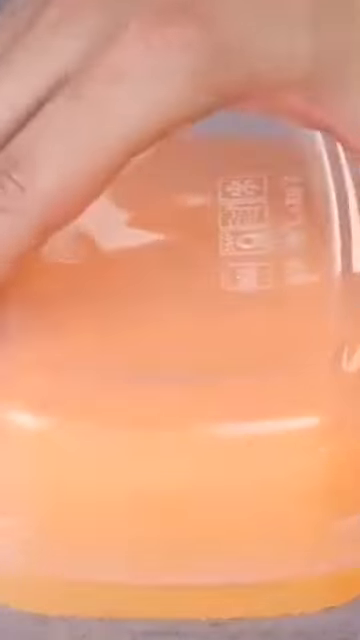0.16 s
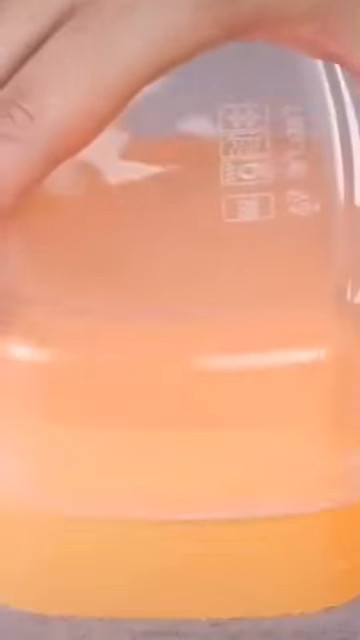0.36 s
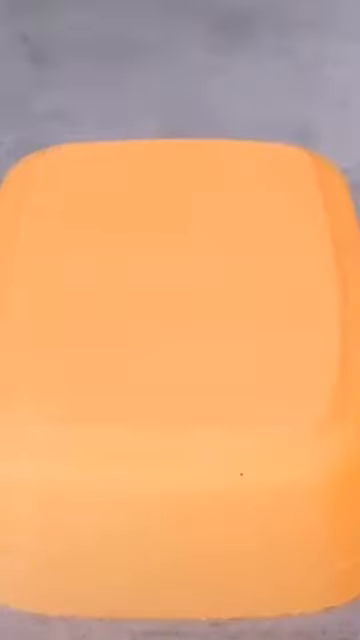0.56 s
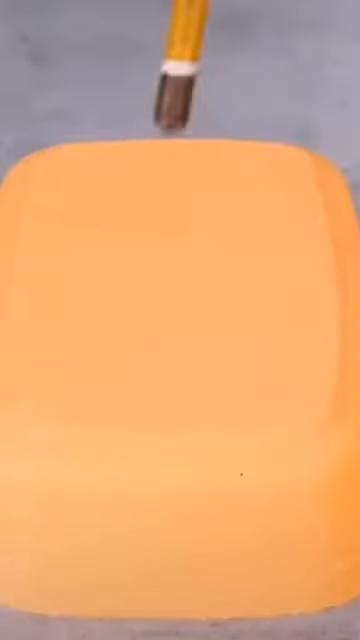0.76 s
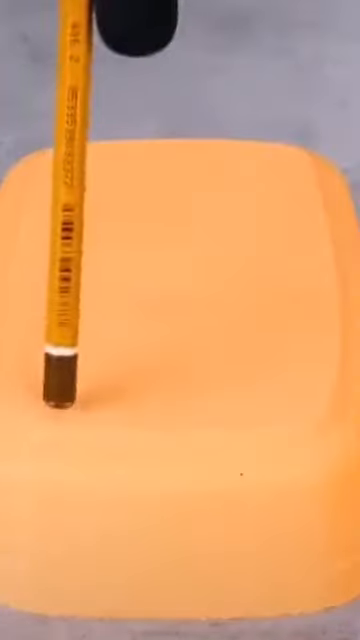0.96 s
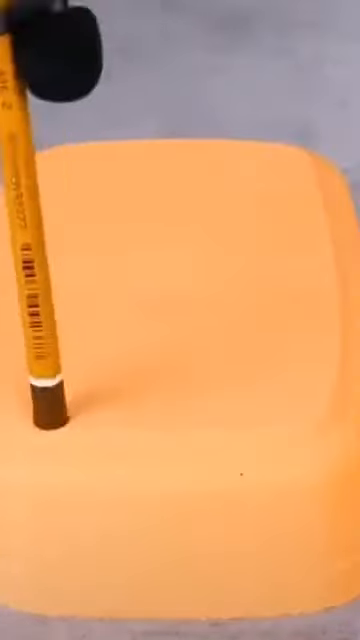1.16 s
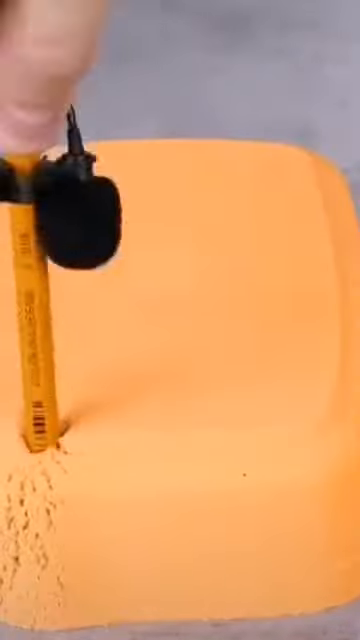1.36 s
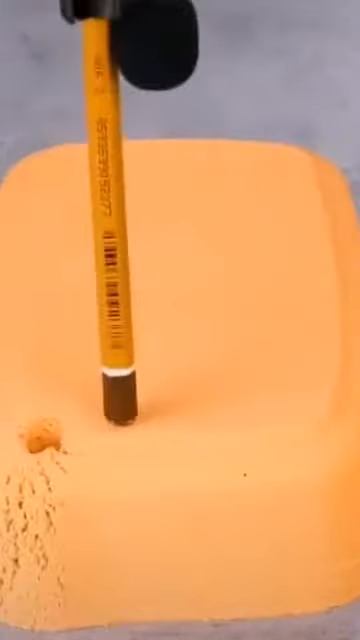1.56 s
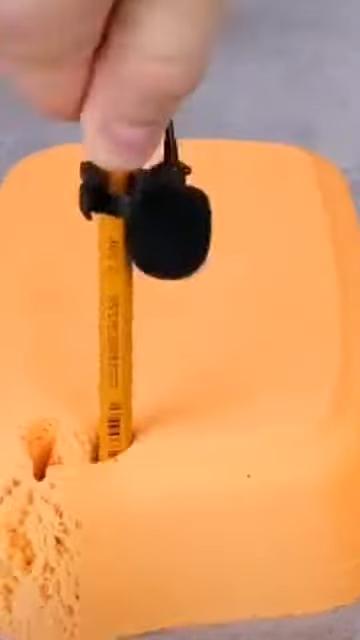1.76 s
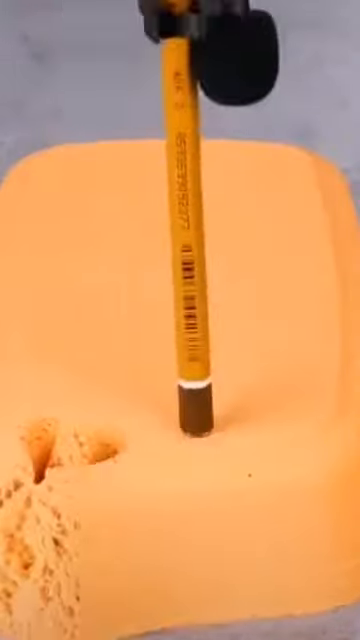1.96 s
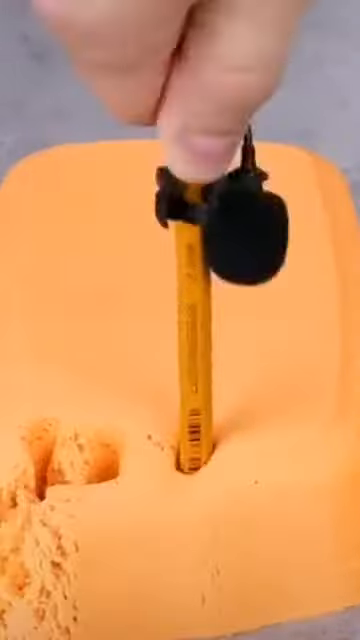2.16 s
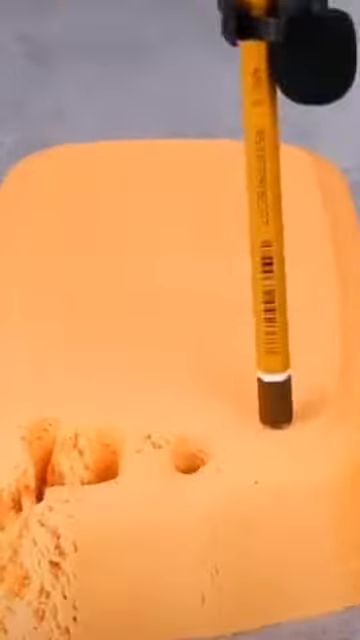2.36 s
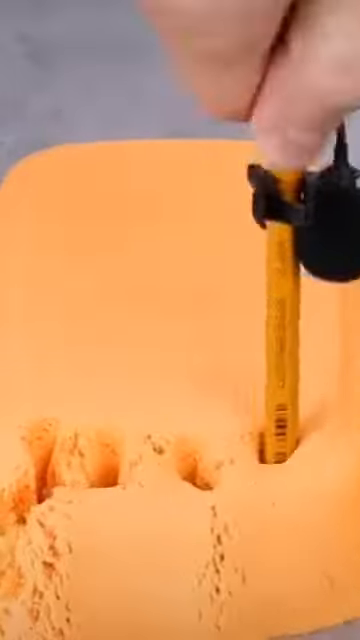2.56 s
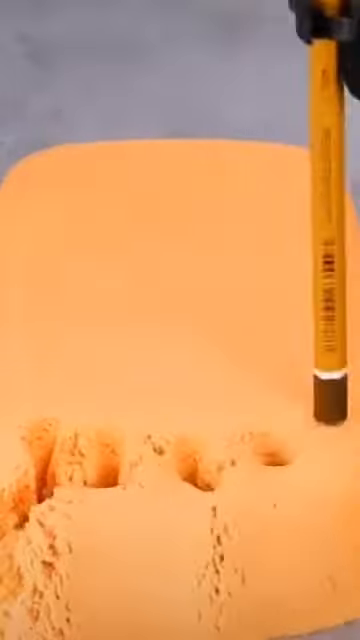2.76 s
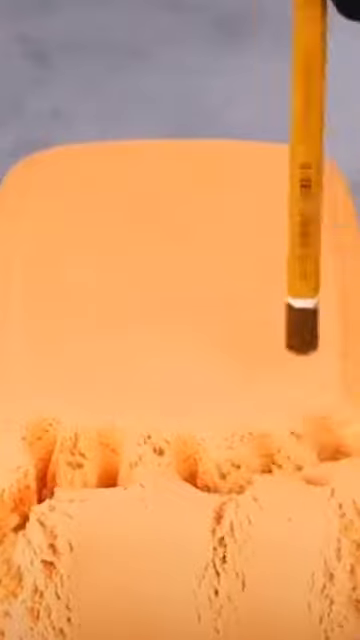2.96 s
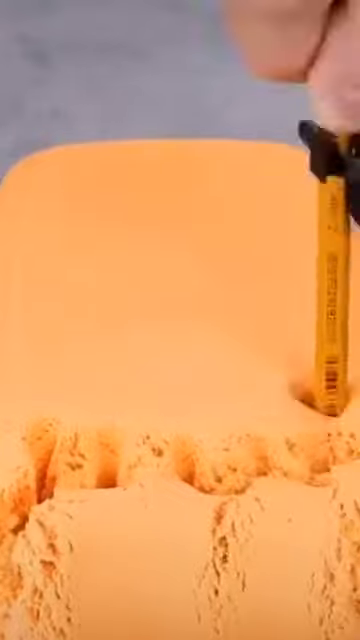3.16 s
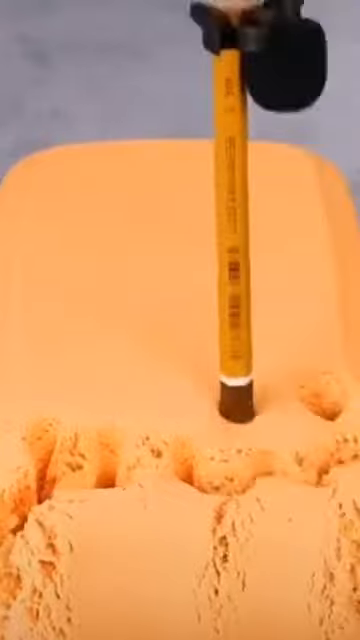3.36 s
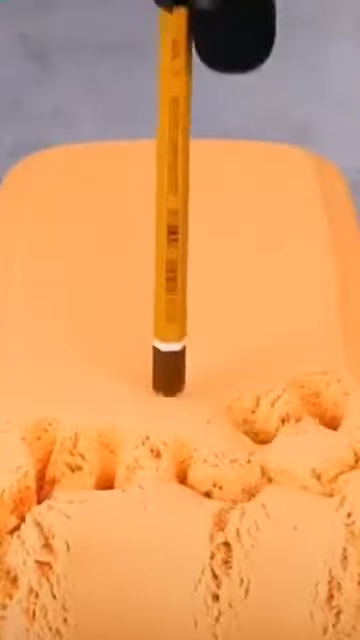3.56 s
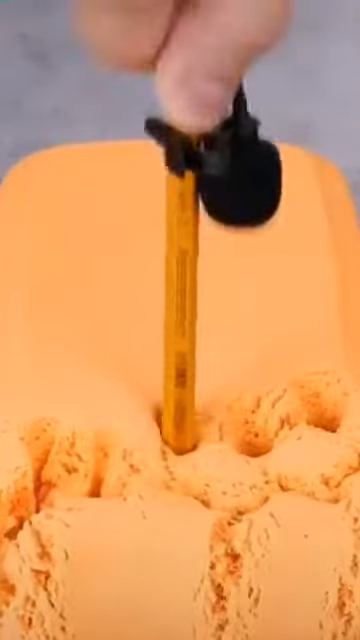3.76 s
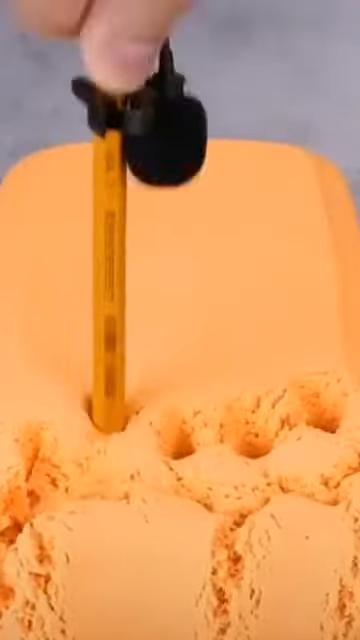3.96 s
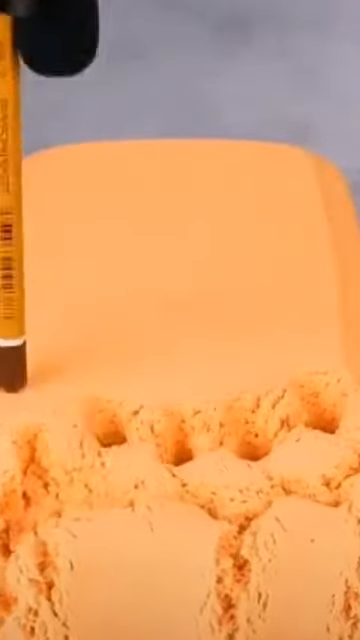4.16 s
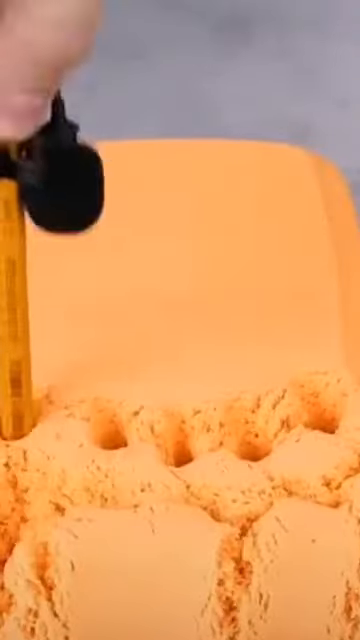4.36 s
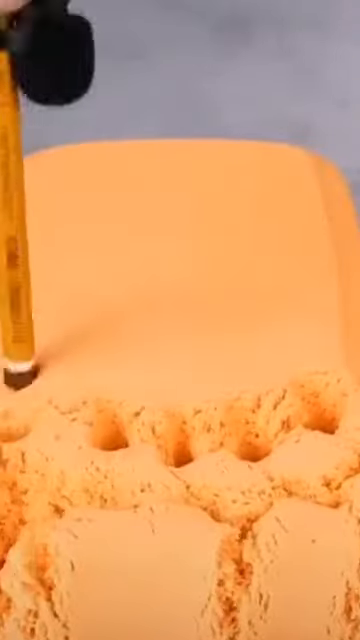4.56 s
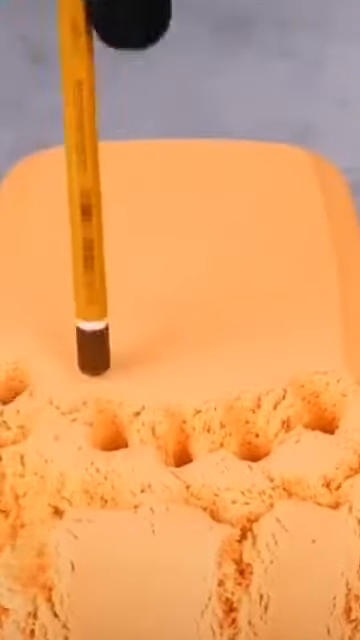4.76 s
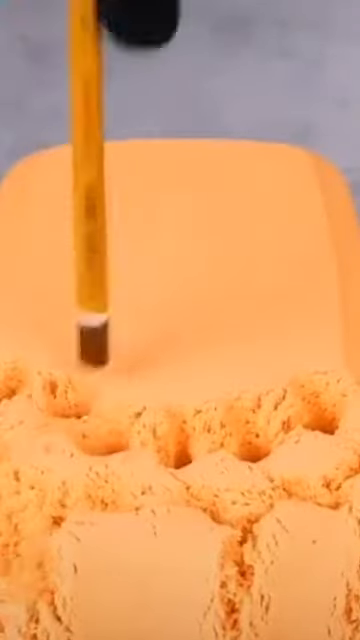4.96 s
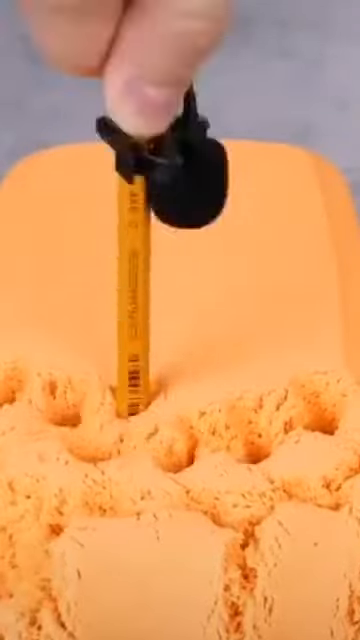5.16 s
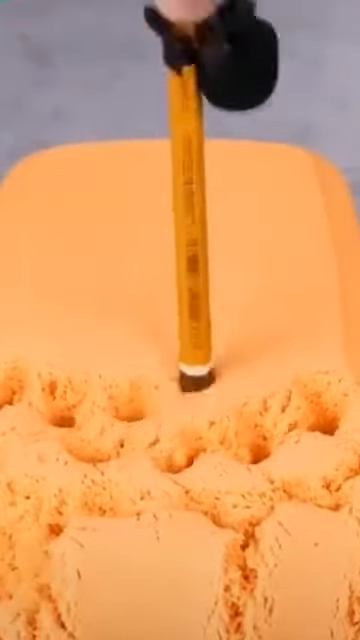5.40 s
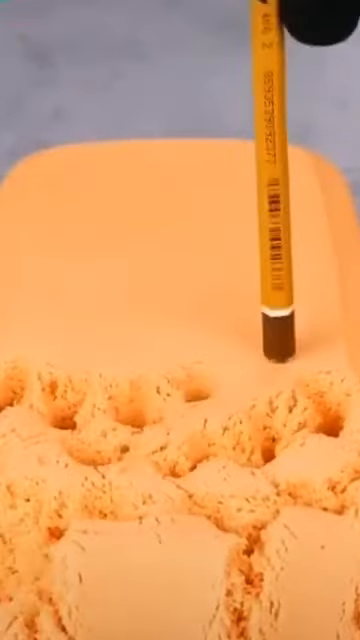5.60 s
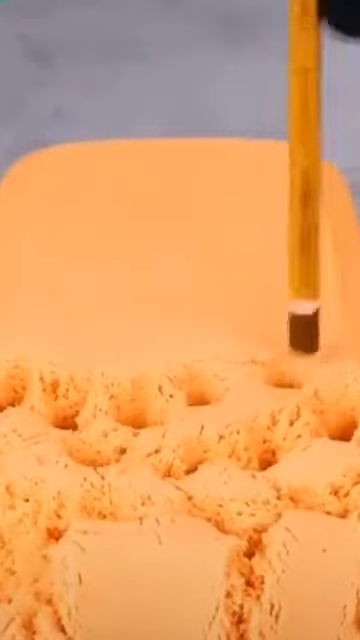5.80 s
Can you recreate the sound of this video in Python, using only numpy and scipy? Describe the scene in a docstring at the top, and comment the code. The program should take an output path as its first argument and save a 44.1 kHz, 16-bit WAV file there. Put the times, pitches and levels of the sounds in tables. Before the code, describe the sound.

A half-second scrape of thin hard plastic with a couple of hollow knocks, then quiet. Next come fourteen pencil pushes into a firm sand block: a short dry woody tap, then crisp grains giving way in a swelling crunch that dies before the next tap. Breaking clods snap and low handling thumps sit faintly below. Microphone on the pencil, dry room, almost no background.

```python
"""A rasp and hollow knocks open the scene: a plastic tub is pulled off a block of damp crunchy sand.
Then the blunt end of a pencil, with a small microphone clipped to it, is pushed into the sand fourteen times.
Each push is a swelling crunch of slipping grains, made of random clicks in narrow flickering bands; each
landing is a dry tap, made of pulse pairs and short wood ringing. Breaking clods, snapping grains and dull
knocks stand out of the crunch; hand and table rumble faintly below as filtered noise."""
import sys
import numpy as np
from scipy import signal
from scipy.io import wavfile
from scipy.ndimage import uniform_filter1d

SR = 44100
rng = np.random.default_rng(int(sys.argv[2]) if len(sys.argv) > 2 else 0)


def master(y):
    """Save y as 16-bit WAV."""
    cut = np.clip(np.atleast_2d(y).T, -1, 1)
    pcm = np.round(cut * 32767)  # scale
    wavfile.write(sys.argv[1], SR, pcm.astype(np.int16))


def rack_gain(trim_db):
    """Turn a fader trim in dB into the linear factor to multiply a signal by."""
    fader = np.asarray(trim_db, float)
    return 10 ** (fader / 20)


N = 257103
TIME = np.arange(N) / SR   # s

# landings of the pencil: start_s, stop_db, gap_ms (start of the stop to the rebound), width_ms (each pulse),
# wood_db (firmness: drive of the wood relative to the stop)
TAPS = [(1.044, -17.5, 0.65, 0.48, -27), (2.0037, -14, 0.64, 0.41, -24), (2.4118, -9, 0.81, 0.39, -27.5),
        (2.775, -14.5, 0.72, 0.5, -24.5), (3.0643, -4, 0.78, 0.53, -34.5), (3.3779, 6, 0.57, 0.32, -35),
        (3.6446, -3.5, 0.76, 0.54, -34), (3.9236, 0, 0.68, 0.39, -41), (4.2028, -7.5, 0.84, 0.51, -35),
        (4.5492, -8, 0.87, 0.48, -31), (4.829, -2, 0.78, 0.41, -36.5), (5.0992, -1, 0.8, 0.54, -37),
        (5.3581, -4, 0.79, 0.62, -37), (5.6154, -5.5, 0.85, 0.61, -40.5)]


def rms_one(x):
    """Scale to rms 1."""
    return x / np.sqrt(np.mean(x ** 2) + 1e-20)


def in_time(rows):
    """Read the columns of a table as curves over time, practically silent outside it."""
    times_s, *columns = np.transpose(rows)
    return [np.interp(TIME, times_s, column, left=-140, right=-140) for column in columns]


def stretches(tables, lead_s):
    """Join tables: each sets in at once, lead_s before its first row; until then the last one holds."""
    rows = list(tables[0])
    for table in tables[1:]:
        start_s = table[0][0] - lead_s
        hold = (start_s - .001, *rows[-1][1:])
        onset = (start_s, *table[0][1:])
        rows += [hold, onset, *table]
    return in_time(sorted(rows, key=lambda row: row[0]))


def at_hz(points, hz):
    """Read a spectrum on a log frequency axis."""
    points_hz, values = np.transpose(points)
    return np.interp(np.log(hz), np.log(points_hz), values)


def drift(rate_hz):
    """Slow random wandering with spread 1, drawn at every 20th sample and interpolated."""
    r = np.exp(-40 * np.pi * rate_hz / SR)
    noise = rng.standard_normal(N // 20 + 1002)
    slow = signal.lfilter([1], [1, -2 * r, r * r], noise)[1000:]   # skip the filter's start
    return np.interp(np.arange(N) / 20, np.arange(len(slow)), rms_one(slow))


def ring(force, hz, t60_s):
    """A resonance: a unit click sets a sine of height 1 ringing, falling 60 dB in t60_s."""
    r = rack_gain(-60 / (t60_s * SR))
    w = 2 * np.pi * hz / SR
    return signal.lfilter([0, np.sin(w)], [1, -2 * r * np.cos(w), r * r], force + 1e-18)


def band(x, low_hz, high_hz, order=2):
    """Butterworth band-pass."""
    return signal.sosfilt(signal.butter(order, [low_hz, high_hz], "band", fs=SR, output="sos"), x)


def bump(start_s, width_s):
    """One smooth push of height 1."""
    return np.sin(np.pi * np.clip((TIME - start_s) / width_s, 0, 1)) ** 2


def grains(spectrum, parts, per_s, spread_db, clump_db, patchy_db):
    """Grains slip in clumps and ring narrow flickering bands; parts = (low Hz, high Hz, level dB curve)."""
    # left-right likeness over frequency: pitch_hz, likeness (1 = the same in both channels)
    likeness = [(300, 0.89), (3900, 1), (4600, 0.67), (6500, 0.24), (9000, 0.16), (13000, 0.31)]
    clumps = rack_gain(clump_db * drift(90))
    slips = rng.random((3, 2, N)) < per_s / SR      # neighbouring bands are rung by other grains
    strengths = rack_gain(spread_db * rng.exponential(1, slips.shape))
    slips = slips * strengths * rng.choice([-1, 1], slips.shape) * clumps
    out = np.zeros((2, N))
    k = 0
    for low_hz, high_hz, level_db in parts:
        part = 0
        edges = np.geomspace(low_hz, high_hz, 2 + int(6 * np.log2(high_hz / low_hz)))
        for low, high in zip(edges, edges[1:]):
            k += 1
            mid, side = band(slips[k % 3] + 1e-18, low, high)
            hz = np.sqrt(low * high)
            alike = np.clip(at_hz(likeness, hz), 0, 1)
            flicker_db = patchy_db * (1 + 600 / hz) * drift(23)   # coarse lumps come more unevenly
            gain = rack_gain(at_hz(spectrum, hz) + flicker_db)
            part = part + gain * (np.sqrt(1 + alike) * mid + np.sqrt(1 - alike) * side * [[1], [-1]])
        out += rack_gain(level_db) * part / np.sqrt(np.mean(part.mean(axis=0) ** 2))
    return out


def crunch():
    """Sand gives way under the pencil as slipping grains; a breaking clod is a short surge in every band."""
    # the pushes in stretches, the first push in two and every other in one:
    # time_s, fine_db (fine grit), coarseness_db (how much the larger lumps give way)
    pushes = [
        [(1.052, -55.5, -1), (1.16, -51.5, -38), (1.188, -49, -24), (1.206, -44.5, -39), (1.274, -39, -3),
         (1.29, -37.5, -11.5), (1.424, -25, -7), (1.464, -30, -19), (1.478, -40, 8), (1.52, -41, -10.5),
         (1.62, -83, -6)],
        [(1.638, -68, 8), (1.664, -47.5, -24.5), (1.796, -22, -5), (1.84, -21, -13), (1.876, -43.5, -8.5),
         (1.892, -36, -5.5), (1.93, -71, -4), (1.978, -75, -13), (1.99, -76, -22)],
        [(2.012, -51.5, -4), (2.058, -50.5, -10.5), (2.076, -40, -29.5), (2.102, -34.5, -7.5),
         (2.16, -29.5, -4), (2.208, -18.5, -11), (2.25, -41, -11.5), (2.296, -40.5, -1), (2.32, -69, 8.5),
         (2.386, -80, -24), (2.4, -103, 16)],
        [(2.42, -51, 2.5), (2.446, -50, -10.5), (2.52, -33, -16), (2.586, -24, -3.5), (2.618, -23.5, -16),
         (2.64, -42, -15), (2.66, -44.5, 1), (2.674, -62, -5), (2.688, -49, 16), (2.704, -73, 12),
         (2.765, -79, -14)],
        [(2.785, -44, -9), (2.825, -43.5, -18.5), (2.853, -33.5, -8.5), (2.893, -30.5, 1), (2.913, -21.5, -2.5),
         (2.945, -36, -13.5), (2.959, -49.5, 0), (2.991, -41, -11.5), (3.021, -71, 1), (3.045, -75, -9),
         (3.055, -97, 15)],
        [(3.073, -45.5, 0), (3.093, -45, -6), (3.111, -46, -18), (3.159, -24.5, -6), (3.185, -23.5, -0.5),
         (3.221, -20.5, -15), (3.269, -46.5, -1), (3.285, -44, -15), (3.305, -69.5, 2), (3.351, -73, -18),
         (3.37, -82, 5)],
        [(3.386, -44, -1.5), (3.406, -39.5, -10), (3.456, -26.5, -7), (3.478, -26, -6), (3.49, -21, -8),
         (3.498, -17, -10), (3.522, -26, -14.5), (3.54, -42, 2), (3.556, -46, -4.5), (3.622, -75, -2),
         (3.635, -88, 8)],
        [(3.653, -48, 0), (3.657, -50, -5), (3.701, -30, -10.5), (3.745, -25, -1.5), (3.777, -22.5, -4),
         (3.787, -22.5, -9), (3.807, -36, -12.5), (3.823, -39, 4), (3.853, -41.5, -11), (3.897, -78, 3),
         (3.915, -85, 19)],
        [(3.932, -51, -4), (3.952, -42, -9), (4.02, -26.5, 0.5), (4.062, -21, -9), (4.086, -33.5, -17),
         (4.096, -44.5, 5.5), (4.144, -31.5, -10.5), (4.19, -84, 6), (4.195, -79, 25)],
        [(4.211, -37.5, -11), (4.221, -53.5, 7), (4.273, -43, -13), (4.319, -31, -15), (4.335, -36, 1.5),
         (4.393, -19.5, -8.5), (4.435, -43.5, -6), (4.461, -42.5, -9), (4.499, -76, -0.5), (4.525, -73, -8),
         (4.54, -88, 2)],
        [(4.558, -57, 11), (4.572, -46, -17), (4.598, -41, -6.5), (4.616, -30.5, -13), (4.648, -30, 0.5),
         (4.684, -21.5, -11), (4.696, -25, 1), (4.712, -26, -6.5), (4.814, -78.5, 0), (4.82, -75, 17)],
        [(4.837, -49.5, -12), (4.859, -41.5, -12.5), (4.891, -25.5, -4.5), (4.925, -27, -4.5),
         (4.953, -19, -9.5), (5.051, -77.5, 5), (5.075, -68.5, -26.5), (5.09, -75, 17)],
        [(5.107, -43, 1.5), (5.111, -44, -25), (5.131, -38.5, -6), (5.151, -28, 1), (5.169, -20, -9.5),
         (5.185, -28, 1.5), (5.211, -18.5, -6.5), (5.247, -41.5, -7.5), (5.279, -34.5, -13), (5.319, -75.5, 3),
         (5.35, -72, -8)],
        [(5.366, -48, 1), (5.392, -42, -8), (5.42, -28, -6.5), (5.48, -23, -7), (5.496, -19.5, -15),
         (5.506, -27, -19), (5.514, -40.5, -2.5), (5.542, -34, -10), (5.58, -70.5, -6), (5.605, -76, 8)],
        [(5.624, -44, -4), (5.656, -44.5, -9), (5.686, -27, -4.5), (5.704, -29.5, 0), (5.742, -15.5, -13.5),
         (5.752, -23.5, -10.5), (5.772, -39, -5.5), (5.79, -42, -5), (5.804, -35.5, -11), (5.816, -35, -14),
         (5.83, -60, -7)],
    ]
    # clods breaking off: time_s, strength_db, fall_ms (time constant)
    clods = [(1.267, -38, 5.5), (1.48, -12, 1.1), (1.549, -28, 5), (1.627, -45, 3), (2.305, -33, 2),
             (2.685, -12, 1.35), (2.907, -17, 8.4), (3.187, -22, 2.7), (3.497, -3, 3), (3.537, -21.5, 6.7),
             (3.573, -25, 2.6), (3.769, -19, 3.5), (3.818, -20, 4.1), (4.051, -9, 9), (4.387, -14, 1.7),
             (4.951, -8, 1.8), (5.205, -10, 4.5), (5.419, -15, 7.3), (5.682, -33, 4.9)]
    # grain sizes from lumps to fine grit: offset_db (re grit), follows (share of the coarseness swing),
    # share_db (share of a clod's surge)
    sizes = [(-8.5, 1.07, -13), (-0.25, 0.89, -9.5), (0.5, 0.51, -5), (1.08, 0.009, -1.5)]
    # colour of the slipping grains: pitch_hz, density_db (relative, per Hz)
    spectrum = [(450, 1), (560, -20), (850, -5.5), (1400, -7.5), (2300, -2.5), (3200, -5.5), (4500, -7.5),
                (6200, -5.5), (7800, -4.5), (9600, 1.5), (11000, -1.5), (13000, -9)]
    rise_ms = 0.3
    fine_db, coarseness_db = stretches(pushes, .008)
    surge = 0
    for s, db, fall_ms in clods:
        age_ms = 1000 * (TIME - s - .002)
        surge = surge + rack_gain(db - 13) * np.exp(-np.maximum(-age_ms / rise_ms, age_ms / fall_ms))
    levels_db = []
    for offset_db, follows, share_db in sizes:
        sliding = rack_gain(fine_db + offset_db + follows * coarseness_db)
        levels_db.append(20 * np.log10(sliding + rack_gain(share_db) * surge))
    parts = zip([520, 1100, 2300, 5000], [1100, 2300, 5000, 13600], levels_db)
    return grains(spectrum, parts, per_s=6700, spread_db=0.5, clump_db=1.5, patchy_db=2.0)


def landings():
    """The tip stops (pull), rebounds (push); the wood rings briefly, the table thuds and sends an echo."""
    # ringing modes of the pencil: pitch_hz, level_db, t60_s
    modes = [(237, 11.5, 0.014), (514, -3.5, 0.029), (835, -14, 0.036), (1810, 18.5, 0.0018),
             (2910, -9, 0.033), (3780, -1, 0.012), (9170, 11, 0.0069)]
    table_hz, table_t60_s, table_echo_ms = 88, 0.024, 2.26
    echo_over_wood_db = 17.5   # firm sand passes more on to the table too
    blow, rebound, thud, crack = np.zeros((4, N))
    struck = np.zeros((len(modes), N))
    vary_db = rng.normal(0, 0.77, (len(TAPS), len(modes)))   # mode strengths vary a little from tap to tap
    for (s, db, gap_ms, width_ms, wood_db), tap_vary_db in zip(TAPS, vary_db):
        width_s = max(width_ms, .1) / 1000
        echo_db = db + wood_db + echo_over_wood_db
        for lag_ms, gain in [(0, rack_gain(db)), (table_echo_ms, rack_gain(echo_db))]:
            start_s = s + lag_ms / 1000
            blow -= gain * bump(start_s, width_s)
            rebound += gain * bump(start_s + gap_ms / 1000 - 0.47 * width_s, width_s)
        struck[:, round(s * SR)] = -rack_gain(db + wood_db + tap_vary_db)
        thud -= rack_gain(db - 51) * bump(s, 0.00027) / (0.0021 * SR)
        crack += rack_gain(db - 24.5) * np.exp(-np.maximum(TIME - s, 0) / 0.0025) * (TIME >= s)
    slack = np.exp(-1 / (0.0002 * SR))      # the rebound dies away more slowly than it rises
    blow += 1.07 * signal.lfilter([1 - slack], [1, -slack], rebound)
    # the microphone passes little of the blow below 110 Hz
    blow = signal.sosfilt(signal.butter(2, 110, "high", fs=SR, output="sos"), blow)
    wood = sum(rack_gain(db) * ring(clicks, hz, t60_s) for clicks, (hz, db, t60_s) in zip(struck, modes))
    grit = band(rng.standard_normal(N), 1300, 12000) * crack
    return blow + wood + ring(thud, table_hz, table_t60_s) + grit


def snaps():
    """Short clicks that ring for about two cycles, with an overtone and no bass."""
    # single short clicks, snapping grains and a second contact of the tip at 2.41 s:
    # time_s, strength_db, pitch_hz
    short_clicks = [(1.269, -29.5, 1430), (1.48, -16, 1580), (1.551, -32, 2900), (1.629, -39, 1230),
                    (2.4124, -29, 1970), (2.687, -27.5, 1640), (2.912, -28, 2540)]
    out = np.zeros(N)
    for s, db, hz in short_clicks:
        age_s = np.maximum(TIME - s - .001, 0)
        tone = np.sin(2 * np.pi * hz * age_s) + .7 * np.sin(3.7 * np.pi * hz * age_s)
        out -= rack_gain(db + 2) * tone * np.exp(-age_s * hz / 1.2)
    return band(out, 900, 9000)


def dull_knocks():
    """Some lumps drop with a short, soft, dull knock: a low sine that swells and dies in milliseconds."""
    # dropping lumps: time_s, strength_db, pitch_hz
    drops = [(1.378, -35, 400), (1.48, -36, 710), (1.629, -38.5, 436), (1.761, -38, 614), (2.304, -25, 412),
             (2.589, -35, 663), (2.685, -37, 223), (2.909, -23.5, 540), (3.189, -27, 481),
             (3.537, -32.5, 425), (3.767, -28.5, 660), (4.052, -45, 678), (5.417, -33, 710),
             (5.5, -34, 433), (5.731, -34, 202)]
    out = np.zeros(N)
    for s, db, hz in drops:
        age_s = np.maximum(TIME - s + 0.0007, 0)
        swell = np.exp(-age_s / 0.0036) * (1 - np.exp(-age_s / 0.0033))
        out += rack_gain(db + 6) * np.sin(2 * np.pi * hz * age_s) * swell
    return out


def tub():
    """The wall scrapes along the sand and knocks as it flexes, each knock with its own mode strengths."""
    # one table a tug: time_s, rasp_db, hollowness_db, brightness_db
    tugs = [
        [(0.0, -55, 1, -2), (0.016, -71, 9, 9), (0.024, -57, -1, 1.5), (0.042, -57.5, 8.5, 5.5),
         (0.05, -42.5, 7.5, -9.5), (0.074, -61, 3, 1), (0.094, -50, 6, 1.5), (0.13, -62, 0, -4)],
        [(0.13, -67, 0, -7), (0.162, -48.5, 3, -1.5), (0.172, -45.5, 1.5, -18), (0.182, -55, 8, -8),
         (0.226, -58.5, 7, 0.5), (0.278, -59, -27, -11), (0.29, -49, -39, -12.5), (0.44, -68, -38.5, -13)],
        [(0.44, -75, -38, -7), (0.446, -70, -43, -13), (0.52, -47.5, -9, 4), (0.546, -50, -6, -1),
         (0.566, -73, -11, 1), (0.59, -80, -30, 6), (0.616, -114, 5, 15), (0.64, -114, 4, 21)],
    ]
    # colour of the scrape: pitch_hz, density_db (relative, per Hz)
    spectrum = [(500, -14), (1400, -8), (2000, -14), (2400, -2), (2800, 0), (3300, -7), (5500, -10),
                (7200, -18), (9600, -12), (13000, -16)]
    # knocks of the flexing tub: time_s, strength_db
    flexes = [(0.049, -16), (0.093, -26), (0.1, -31), (0.151, -34), (0.158, -30), (0.17, -12)]
    # ringing modes of the tub: pitch_hz, level_db (relative), t60_s
    modes = [(460, -8, 0.054), (830, -5, 0.041), (1190, -2, 0.0067), (1606, 6.5, 0.0089),
             (2010, 3.5, 0.012), (2800, -12, 0.012), (4140, -13.5, 0.01)]
    scrape_db, hollow_db, bright_db = in_time([row for table in tugs for row in table])
    boom_db = -13.5 + 2 * hollow_db   # the lowest part swings more than the hollow part
    upper_db = -1 + bright_db
    fine_db = -5.5 + 1.54 * bright_db   # the fine part follows brightness more steeply
    parts = [(450, 1100, scrape_db + boom_db), (1100, 2000, scrape_db + hollow_db), (2000, 3500, scrape_db),
             (3500, 6200, scrape_db + upper_db), (6200, 13600, scrape_db + fine_db)]
    out = grains(spectrum, parts, per_s=9000, spread_db=2.0, clump_db=2.5, patchy_db=3.0)
    at = [round(s * SR) for s, db in flexes]
    flex_db = np.array(flexes)[:, 1]
    vary_db = rng.normal(0, 0.86, (len(flexes), len(modes)))
    for k, (hz, db, t60_s) in enumerate(modes):
        clicks = np.zeros(N)
        clicks[at] = rack_gain(flex_db + db - 14.5 + vary_db[:, k]) * (-1) ** k
        out += ring(clicks, hz, t60_s)
    return out


def stirring():
    """Levels of the three low layers: uneven background, a dying stir after each landing, and the jolts."""
    # uneven low background rumble: time_s, level_db
    background = [(0, -55), (.1, -78), (.29, -104), (.4, -90), (.464, -71), (.526, -106), (.63, -106),
                  (.81, -70), (1.0, -83), (1.1, -69.5), (1.3, -70.5), (1.65, -62), (1.75, -100),
                  (1.9, -63.5), (2.4, -71), (2.53, -104), (2.65, -74.5), (5.83, -65.5)]
    # jolts of the hand: time_s, table_db (table mode), deep_db (deep part), block_db (block part)
    jolts = [(.022, -53, -66, -52), (.05, -63, -47, -49.5), (.1, -57.5, -60.5, -75), (.826, -72, -76, -68),
             (1.38, -41.5, -50, -51), (1.405, -54, -62, -63), (1.65, -64, -71, -77), (1.887, -53, -70, -71),
             (2.08, -53.5, -66, -76), (2.13, -47, -59, -80), (2.2, -44, -55.5, -83),
             (2.266, -50.5, -69, -66), (2.308, -55, -70, -49), (2.61, -53, -87, -80), (2.69, -52, -77, -67),
             (2.83, -67, -73, -63), (2.93, -49, -61, -82), (3.12, -67, -61, -43), (3.216, -59, -57, -92),
             (3.488, -41, -61, -83), (3.538, -57.5, -53.5, -52), (3.78, -41, -66, -59),
             (3.84, -59, -61, -76.5), (4.063, -46.5, -51, -69.5), (4.419, -47, -58, -84),
             (4.663, -51, -51.5, -75), (4.734, -58, -64, -77), (4.88, -61, -55, -57),
             (4.951, -43, -63, -58), (5.15, -43, -67, -51), (5.213, -49.5, -61, -67), (5.41, -55, -61, -53),
             (5.515, -51, -60, -50), (5.742, -32, -55, -37)]
    # what a landing leaves in table mode, deep part, block part: level_db, follows (share of the landing's dB),
    # fall_db_per_s, background_share_db (the layer's level re the background curve)
    after_tap = [(-33.5, 0.68, 491, -5.3), (-63, 1.5, 153.5, -2), (-38, 0.2, 396.5, -12)]
    rise_db_per_s, jolt_fall_db_per_s = 1297.5, 302
    background_db, = in_time(background)
    gains = []
    for k, (db, follows, fall_db_per_s, background_share_db) in enumerate(after_tap):
        gain = rack_gain(background_db + background_share_db)
        for s, tap_db, *shape in TAPS:
            stir_db = db + follows * tap_db - fall_db_per_s * np.maximum(TIME - s, 0)
            gain = gain + rack_gain(stir_db) * (TIME >= s)
        for s, *jolt_db in jolts:
            below_peak_db = np.maximum(rise_db_per_s * (s - TIME), jolt_fall_db_per_s * (TIME - s))
            gain = gain + rack_gain(jolt_db[k] - below_peak_db)
        gains.append(gain)
    return gains


def rumble():
    """Noise bands for the table mode, a deeper rumble and dull knocks in the block, over a faint room floor."""
    # colour of the room floor: pitch_hz, density_db (relative, per Hz)
    floor_spectrum = [(330, -4), (450, -12), (660, -6), (900, -18), (1300, -26), (13000, -30)]
    floor_db = -94   # rms
    floor = sum(rack_gain(db) * band(rng.standard_normal(N), hz, 1.3 * hz) for hz, db in floor_spectrum[:-1])
    out = rack_gain(floor_db) * np.array([rms_one(floor)] * 2)
    # table mode, deep part, block part: low_hz, high_hz, flicker_db, side_db
    layers = [(86.0, 108, 2.2, -29.5), (28, 69, 1.4, -11.5), (190, 278.6, 6.2, -18.5)]
    for gain, (low_hz, high_hz, flicker_db, side_db) in zip(stirring(), layers):
        noise = band(rng.standard_normal((2, N)), low_hz, high_hz)
        mid, side = noise * rack_gain(flicker_db * drift(12))
        out += gain * (mid + rack_gain(side_db) * side * [[1], [-1]]) / np.std(mid)
    return out


def scene():
    """All sources, heard from the pencil's microphone."""
    return crunch() + dull_knocks() + snaps() + landings() + tub() + rumble()


def suppressor(x):
    """In short frames, turns down bass far below the strongest band and treble weaker than its neighbours."""
    below_strongest_db, below_neighbours_db, muted_db = -28, -8.5, -40.5
    hz, _, z = signal.stft(x, SR, nperseg=1024)
    power = uniform_filter1d(np.mean(np.abs(z) ** 2, axis=0), size=3, axis=0) + 1e-20
    treble_limit = uniform_filter1d(power, size=25, axis=0) * rack_gain(2 * below_neighbours_db)
    bass_limit = power.max(axis=0) * rack_gain(2 * below_strongest_db)
    limit = np.where(hz[:, None] > 1200, treble_limit, bass_limit)
    gain = rack_gain(muted_db / (1 + (power / limit) ** 3.5))
    return signal.istft(z * gain, SR, nperseg=1024)[1][:, :N]


def roll_off(x):
    """The treble ends steeply here."""
    return signal.sosfilt(signal.butter(12, 14240, fs=SR, output="sos"), x)


def record(dry):
    """Weak bands are suppressed, peaks rounded softly and the top cut steeply at 13 kHz."""
    rounded = .95 * np.tanh(suppressor(dry) / .95)
    mix = signal.sosfilt(signal.ellip(8, 1, 55, 13080, fs=SR, output="sos"), rounded)
    return roll_off(mix)


dry = scene()
out = record(dry)
master(out)
```